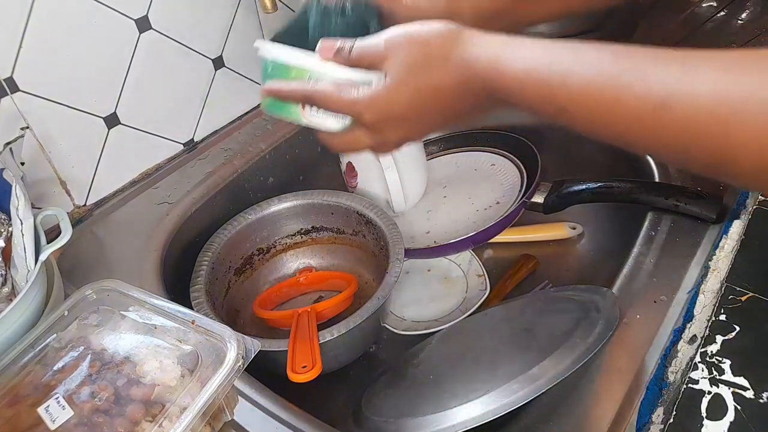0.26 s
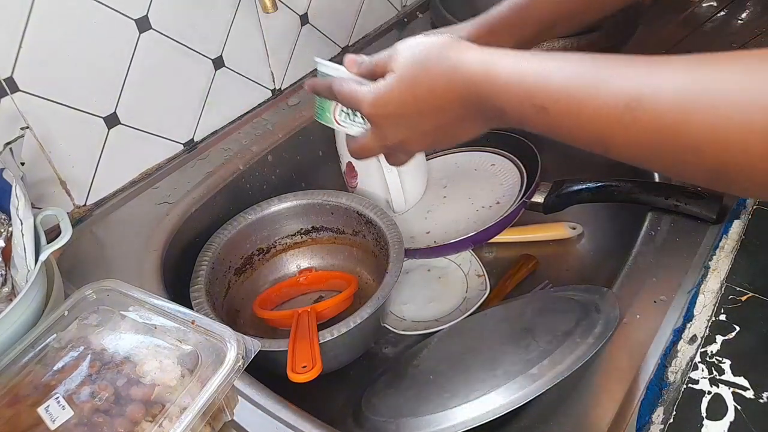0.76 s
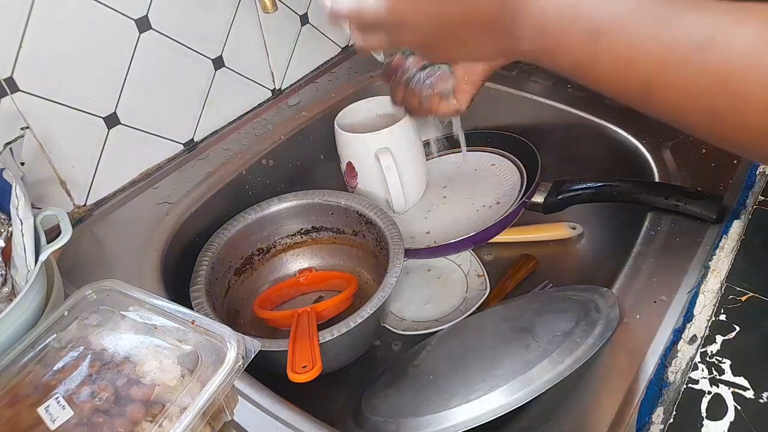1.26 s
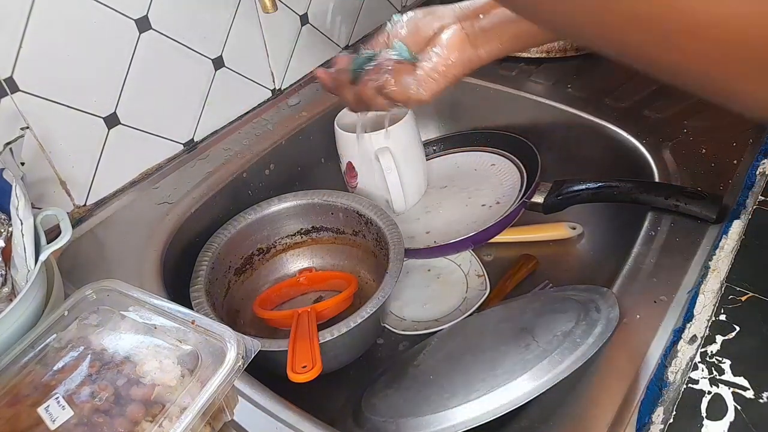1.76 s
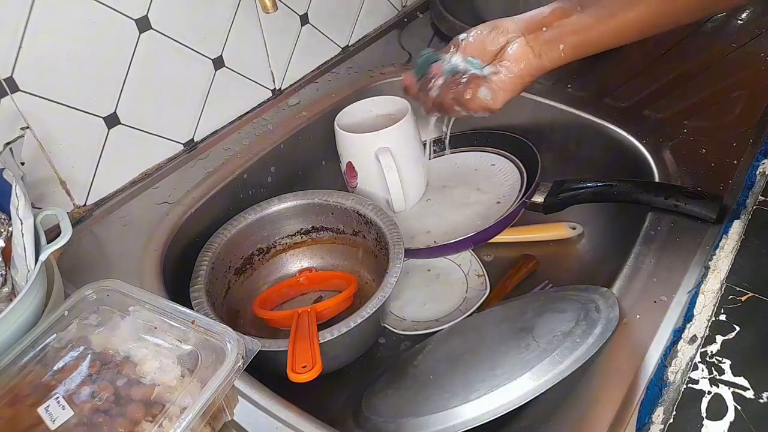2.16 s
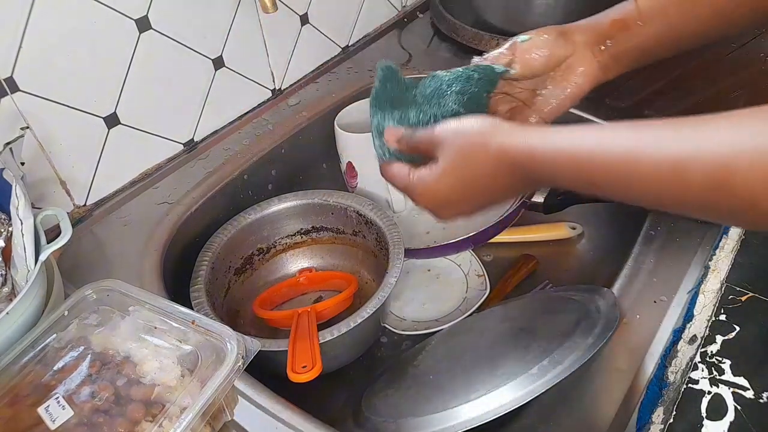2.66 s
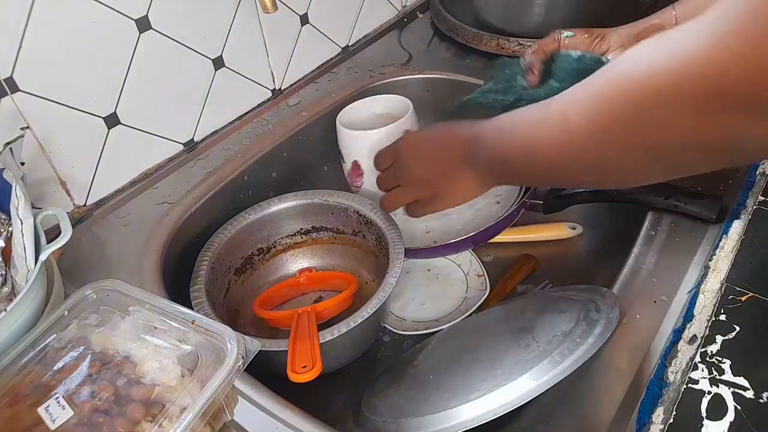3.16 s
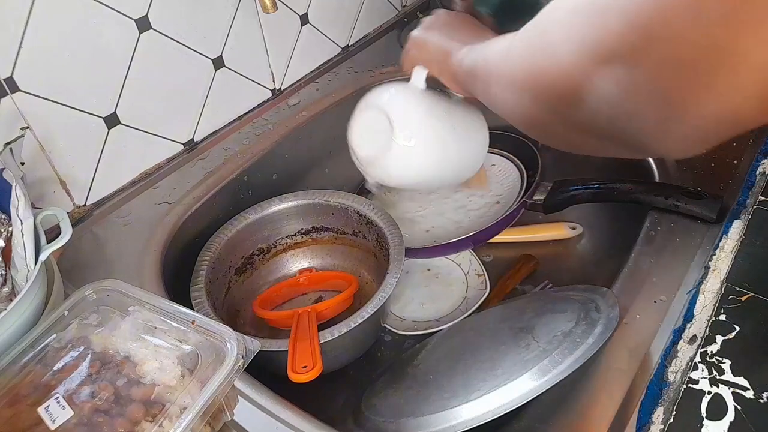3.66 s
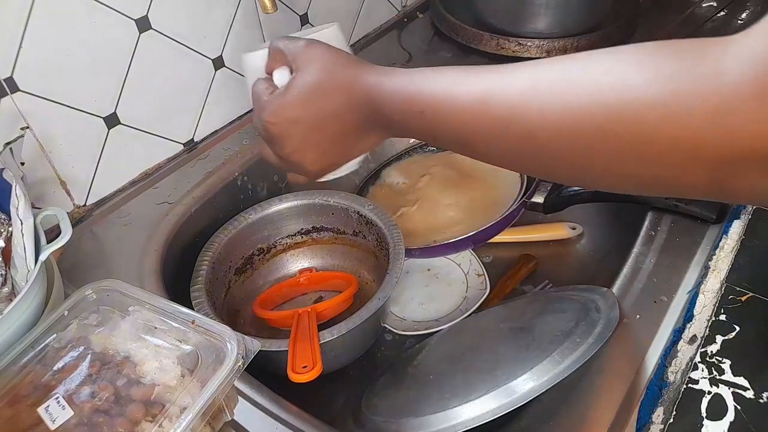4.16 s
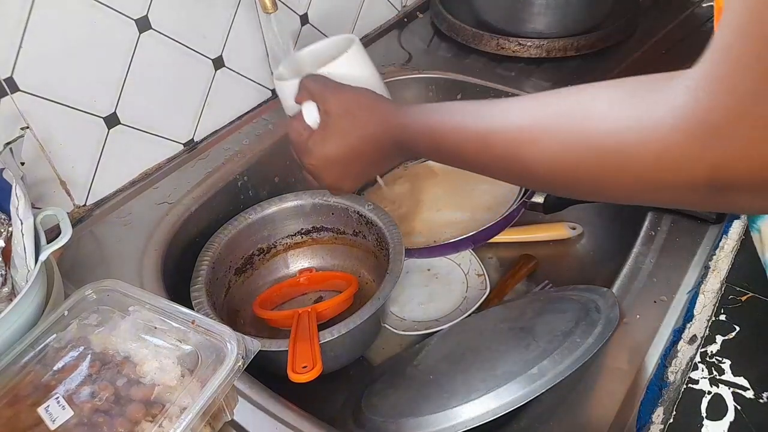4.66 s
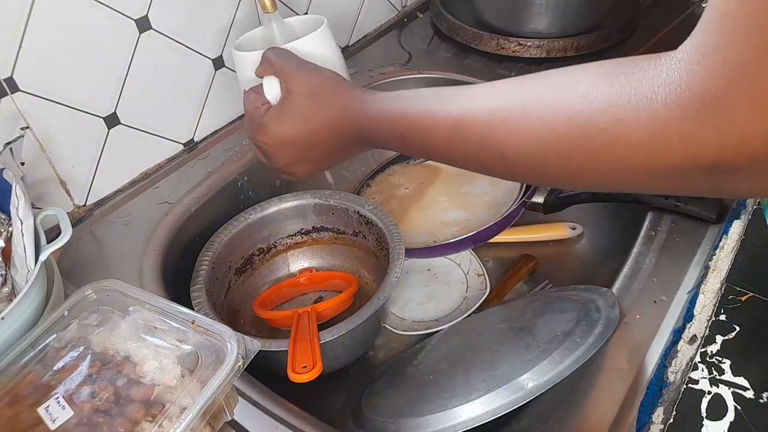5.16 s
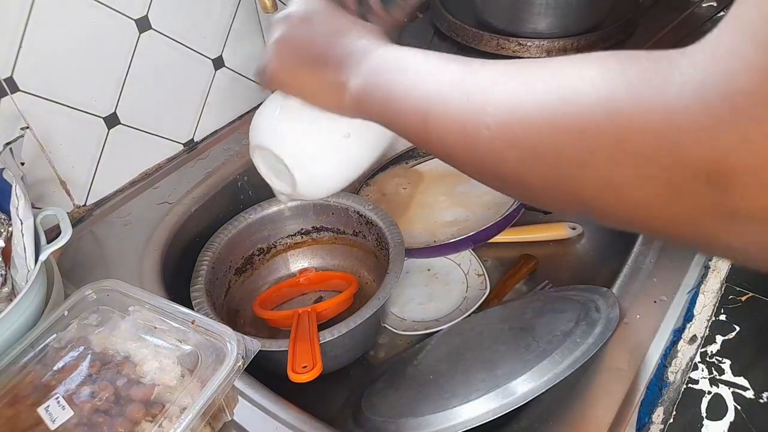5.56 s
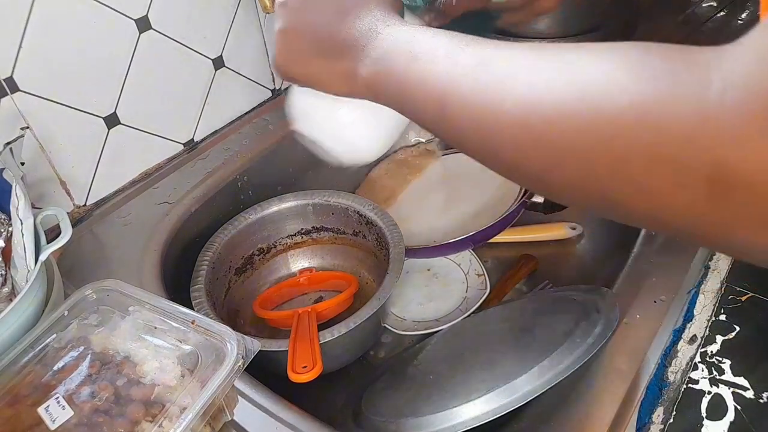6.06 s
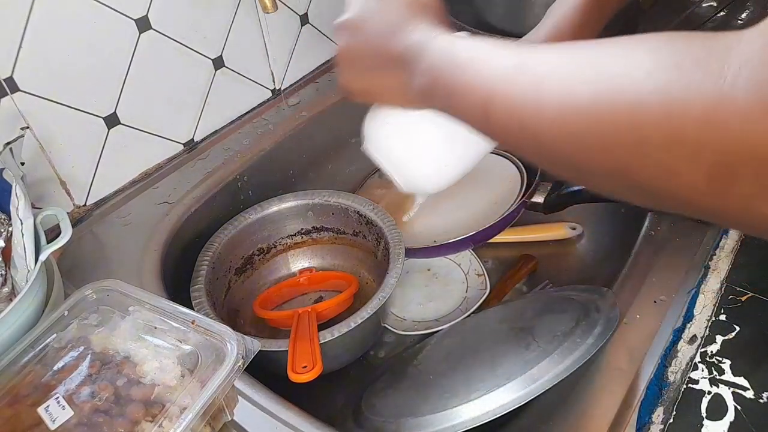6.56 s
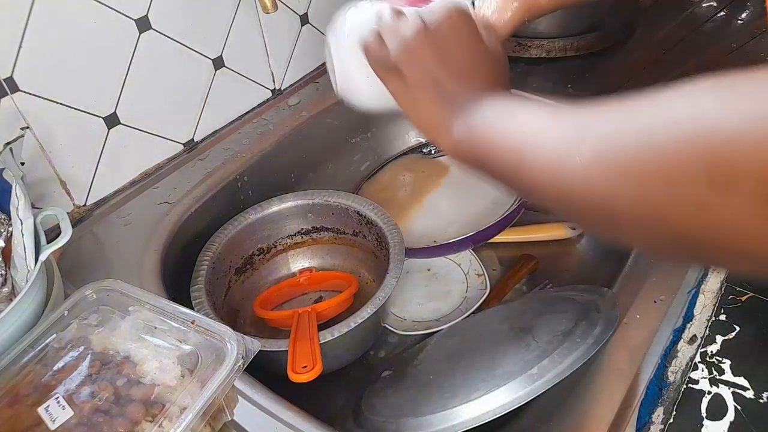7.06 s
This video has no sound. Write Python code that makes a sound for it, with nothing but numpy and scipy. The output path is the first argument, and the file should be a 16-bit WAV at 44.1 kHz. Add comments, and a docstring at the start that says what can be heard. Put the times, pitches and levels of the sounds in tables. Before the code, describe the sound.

Close in a tiled kitchen, a wet sponge fizzes and squelches, a plastic tub cracks down, a mug bumps dishes, then water is poured out.

```python
"""A wet sponge fizzes and squelches close by, amid slaps of water, dull thumps and single drops.
A plastic tub cracks down on the counter, a mug bumps stacked dishes and is emptied in gushes and gulps.
Water is shaped noise with swarms of resonating bubbles; solid bodies are sums of decaying modes.
The tiled kitchen answers with diffuse reverberation, and with standing waves after the tub and hollow notes."""
import sys
import numpy as np
from scipy import signal
from scipy.fft import rfft, irfft
from scipy.io import wavfile

SR = 44100
rng = np.random.default_rng(int(sys.argv[2]) if len(sys.argv) > 2 else 0)


def store_pcm(level_fs):
    """Save levels as 16-bit WAV."""
    pcm = np.round(np.clip(level_fs, -1, 1) * 32767).astype(np.int16)
    wavfile.write(sys.argv[1], SR, np.atleast_2d(pcm).T)


N = 321930
AGE = np.arange(SR // 2) / SR  # time since an event [s]

# Levels are relative: each source adds its own mixing gains.
# Background quiet of the kitchen: (frequency [Hz], relative density [dB])
FLOOR_SPECTRUM = [(20, -23.5), (40, -9), (56, 10), (85, -12.5), (140, -2.5), (220, -17.5), (390, -10),
                  (600, -20.5), (1100, -23.5), (2000, -17.5), (5000, -22), (8000, -26.5), (15500, -23)]
FLOOR_DB = -62
# Reverberation time of the room: (frequency [Hz], t60 [s])
ROOM_T60 = [(60, 0.13), (150, 0.92), (350, 0.42), (700, 0.5), (2000, 0.57), (5000, 0.63), (12000, 0.54)]
# Left-right correlation of diffuse sound: (frequency [Hz], correlation [-1 to 1])
CORRELATION = [(60, 0.99), (150, 0.55), (300, 0.61), (550, 0.57), (900, -0.21), (1400, -0.09),
               (2500, -0.045), (16000, 0.17)]
# Standing waves between the tiled walls: (frequency [Hz], gain [dB])
STANDING_MODES = [(325, 14), (377, 2.5), (402, 10.5), (610, 13.5), (703, 7), (748, 7.5), (1214, 2.5),
                  (1337, 8), (1475, 3), (1603, 8), (1766, 5), (2245, 12)]
# Limits of the microphones and their input
BAND_EDGE_HZ, OVERLOAD = 16000, 0.9

# Spectra of the water sounds: (frequency [Hz], relative density [dB])
FIZZ_SPECTRUM = [(1500, -6.5), (2800, -4.5), (4200, 1), (6000, -7), (8200, -13), (11000, -6), (15500, -8)]
SPRAY_SPECTRUM = [(1500, -16), (2800, -3), (5000, -2), (6500, -3), (8200, -9), (10500, -4), (15500, -9)]
SQUELCH_SPECTRUM = [(450, -26.5), (850, -2.5), (1100, -10), (1500, -6), (2100, -1), (2700, -7),
                    (4000, -23.5)]
SLOSH_SPECTRUM = [(35, -33), (60, -5), (140, -2), (230, -7), (400, 1), (600, -2.5), (850, -7), (1400, -30)]

# Presses and wipes of the sponge:
# (start [s], length [s], fizz level [dB], squelch level [dB], slosh level [dB])
SQUEEZES = [(-.03, 0.21, -53.5, -58.5, -54.5), (.09, .03, -45.5, -48, -44), (.123, 0.1, -38.5, -42, -39),
            (.24, 0.12, -62, -54, -44.5), (.343, 0.058, -49, -42, -41.5), (.46, 0.12, -59, -51.5, -58),
            (.69, 0.13, -62, -55, -61.5), (1.07, 0.085, -63, -62, -61), (1.3, .12, -54.5, -55, -49),
            (1.47, 0.017, -51, -50.5, -48.5), (1.62, 0.18, -58.5, -55.5, -58.5),
            (1.78, 0.021, -45, -47.5, -49.5), (2.16, 0.017, -50.5, -43, -43.5),
            (2.34, 0.02, -52.5, -49.5, -53), (2.48, 0.12, -58.5, -55.5, -60.5),
            (2.72, 0.081, -72, -71, -80), (2.92, 0.062, -64.5, -65, -71), (6.42, 0.081, -63, -52.5, -57),
            (6.68, 0.18, -64, -60.5, -49.5), (6.97, 0.041, -57.5, -58, -68), (7.08, 0.14, -96, -73, -58)]
SQUEEZE_RISE_S, SQUEEZE_SAG_DB_PER_S, SQUEEZE_RELEASE_DB_PER_S = 0.017, 14, 203.5
# Suds seething on between the early squeezes: (fizz level [dB], squelch level [dB], slosh level [dB])
SUDS_LEVELS = (-71.5, -66, -65)
SUDS_S = 2.555

# Slaps of water and wet sponge: (time [s], level [dB], body relative to level [dB], length [s])
SPLATS = [(0.134, -16, -3, 0.018), (.184, -14.5, 0.5, .015), (0.351, -32, 7.5, 0.049),
          (0.482, -28.5, -10, .009), (0.537, -34, 4, .006), (0.79, -44, 18, 0.063),
          (1.081, -36.5, 4.5, .012), (1.497, -35, 12.5, 0.015), (1.783, -33, 2.5, 0.069),
          (2.344, -34.5, 3.5, 0.02), (2.527, -39, 6, 0.031), (3.742, -26.5, -19, 0.0077),
          (3.796, -24.5, -28, .016), (4.036, -39, 13, 0.015), (4.67, -32.5, 8.5, 0.0057),
          (4.768, -25, -20, 0.022), (4.865, -16.5, -19, 0.013), (5.023, -27, -16, .008),
          (5.1, -32, -18, .008), (5.212, -26, -14, 0.024), (5.922, -19, -11, .02),
          (6.058, -25.5, -17, 0.032)]

# Mug bumping the dishes:
# (time [s], dishes level [dB], sink level [dB], china level [dB], scrape level [dB])
BUMPS = [(3.169, -37, -41, -38, -43), (3.186, -28, -38, -27.5, -42), (3.22, -32, -29, -39, -40.5),
         (3.2538, -15, -19, -28, -40), (3.2812, -16.5, -30, -30.5, -32.5), (3.303, -23, -23, -24, -28)]
# Dull thumps of hand and water: (time [s], hollow level [dB], sink level [dB])
THUMPS = [(0.138, -33.5, -69), (0.191, -56, -35.5), (0.273, -48, -52), (0.354, -36.5, -66),
          (2.063, -27.5, -42), (2.123, -35, -42), (2.579, -73.5, -52.5), (4.305, -59, -44.5),
          (5.758, -48, -55), (6.249, -26, -47), (6.284, -32, -59), (6.317, -36.5, -66), (6.723, -58, -52.5),
          (6.768, -46.5, -57)]
# Modes of the bodies struck: (frequency [Hz], relative level [dB], t60 [s])
DISH_MODES = [(246, -11, 0.041), (335, -4.5, 0.08), (453, 1, 0.0081), (531, -5, 0.069), (756, -8.5, 0.036),
              (855, -2.5, 0.02), (1045, -21, 0.013)]
SINK_MODES = [(67, -4.5, 0.38), (86.1, -12.5, 0.74), (109, -0.5, 0.15), (135.7, -3.5, 0.2)]
CHINA_MODES = [(1680, -2, 0.012), (2170, 6.5, 0.016), (3504, -1, 0.026), (5200, 1, 0.005)]
HOLLOW_MODES = [(146, -19, 0.1), (216, 19, 0.014), (322, 10, 0.076), (435, 3, 0.026), (562, 18, 0.059),
                (717, 3.5, 0.042)]
# Gritty scrape: (frequency [Hz], relative density [dB])
GRIT_SPECTRUM = [(500, -10.5), (1000, -14), (1400, 5), (4000, 5.5), (5500, 3.5), (8000, -5), (10000, -4.5),
                 (13500, -2), (16000, -18)]
# Thud of the whole stack shifting: (frequency [Hz], relative density [dB])
THUD_SPECTRUM = [(50, -16), (110, 1), (190, -6), (340, 1), (560, -1.5), (660, -8), (880, 3), (1100, -16.5),
                 (1400, -25), (3000, -41)]
THUD_RE_DISHES_DB, THUD_DECAY_S = -5.5, 0.012

# Single drops and the bubbles they trap: (time [s], level [dB], pitch [Hz])
DROPS = [(0.3529, -35, 1720), (.5412, -41, 864), (3.9086, -33.5, 5600), (4.0385, -27, 2840),
         (4.045, -28.5, 3300), (4.135, -38.5, 1080), (4.596, -31.5, 5540), (4.631, -34, 5100),
         (4.647, -30, 3680), (4.6717, -34, 3400), (4.7985, -27, 5400), (4.871, -26, 7500),
         (4.921, -25, 2340), (5.032, -30.5, 5860), (5.1014, -38, 6330), (5.1603, -28, 4700),
         (5.8238, -38.5, 1480), (5.837, -30.5, 6580), (5.927, -26, 2400), (5.944, -26.5, 3450),
         (6.008, -38, 820), (6.865, -41.5, 820), (7.009, -34, 1980)]
DROP_CYCLES, DROP_RISE = 5.3, 0.087  # ring time [cycles], fractional pitch rise per ring time
DROP_TICK_DB, DROP_TICK_S = -13, 0.0013  # tick relative to its bubble, tick decay
# A drop on the rim of a pan: (time [s], level [dB])
PAN_PING = (4.143, -50)
# Mode of the pan: (frequency [Hz], relative level [dB], t60 [s])
PAN_MODES = [(5060, 0, .09)]

# Short low hollow notes: gulps, their fluttering echoes, and knocks of the sponge in the mug:
# (time [s], level [dB], pitch [Hz], swell [s])
HOLLOW_NOTES = [(1.366, -46.5, 492, 0.0032), (5.2215, -17, 668, 0.002), (5.248, -32, 608.4, 0.008),
                (5.283, -35, 706, 0.002), (5.3415, -13.5, 680, 0.0016), (5.37, -32, 680, 0.0016),
                (6.25, -33.5, 531, 0.0054), (7.006, -38.5, 477, 0.0013), (7.079, -39, 457, 0.0013),
                (7.153, -36, 456, 0.0023)]

# The tub striking the counter: (time [s], level [dB])
TUB_HIT = (1.9803, 0.39)
# Crack of the tub: (frequency [Hz], relative density [dB])
TUB_SPECTRUM = [(50, -44), (180, -21.5), (260, -16), (380, 0), (540, -14), (720, -4), (950, -9), (1300, 0),
                (2350, -3.5), (3150, -21.5), (4200, -16), (8000, -29.5), (12000, -30.5), (16000, -38)]

# Gushes from the tipped mug:
# (start [s], length [s], spray level [dB], bubbles level [dB], slosh level [dB])
GUSHES = [(3.78, 0.06, -40.5, -47.5, -49), (3.895, 0.1, -47, -50, -53), (4.03, 0.074, -53, -47.5, -51.5),
          (4.49, .07, -53.5, -75, -62), (4.565, 0.066, -44, -78, -66.5), (4.765, .09, -39, -73, -59.5),
          (4.86, 0.076, -33.5, -41.5, -60), (5.04, 0.22, -47, -57, -66), (5.2, 0.14, -35, -40, -57.5),
          (5.75, 0.056, -58.5, -78, -55), (5.815, 0.086, -43.5, -54.5, -60),
          (5.915, 0.16, -39.5, -45.5, -49.5), (6.1, 0.04, -58, -48, -51), (6.235, 0.066, -58, -57, -41.5)]
# Steady faint trickle under the later gushes and after them: same columns
TRICKLE = (4.5, 6, -64.5, -63.5, -59)
GUSH_RISE_S, GUSH_SAG_DB_PER_S, GUSH_RELEASE_DB_PER_S = 0.02, 7, 190

# Water swirling round the mug:
# (start [s], length [s], level [dB], resonance [Hz], glide [octaves/s])
SWIRLS = [(4.484, 0.047, -51, 1884, 4), (4.63, 0.063, -54.5, 1740, 1), (4.794, 0.039, -50.5, 1642, 6),
          (4.856, .1, -40.5, 2303, 0.4)]
SWIRL_RISE_S, SWIRL_SAG_DB_PER_S, SWIRL_RELEASE_DB_PER_S = 0.02, 2, 400
# Hum of the air in the mug: (start [s], length [s], level [dB])
HUMS = [(4.5, 0.33, -69), (4.86, 0.082, -47), (5.1, 0.092, -52.5)]
# Modes of that air: (frequency [Hz], relative level [dB], t60 [s])
MUG_AIR_MODES = [(635, 0.27, 0.075), (1010, -1.2, 0.02)]


def amp(db):
    """Decibels: twenty make a tenfold amplitude ratio."""
    return 10 ** (np.asarray(db) / 20)


def unit(x):
    """Normalization to unit root-mean-square."""
    return x / np.sqrt(np.mean(x ** 2) + 1e-20)


def peaked(x):
    """Normalization to unit peak."""
    return x / (abs(x).max() + 1e-20)


def read(points, hz):
    """Linear interpolation of a table along a logarithmic frequency axis."""
    f, value = np.transpose(points)
    return np.interp(np.log(hz + 1), np.log(f + 1), value)


def add(mix, start_s, sound):
    """Superposition: a sound is added to the mix at its onset."""
    part = mix[max(round(start_s * SR), 0):][:len(sound)]
    part += sound[:len(part)]


def impulse(spectrum, size=4096):
    """Minimum phase: the log gain's Hilbert transform fixes the most compact causal click."""
    log_gain = np.log(amp(read(spectrum, abs(np.fft.fftfreq(size, 1 / SR)))))
    response = np.exp(np.conj(signal.hilbert(log_gain)))
    return np.fft.ifft(response).real[:size // 2]


def colour(x, spectrum):
    """Linear filtering: each channel is convolved with a minimum-phase impulse response."""
    return signal.oaconvolve(x, impulse(spectrum)[None], axes=1)[:, :x.shape[1]]


def diffuse(pair):
    """Diffuse-field coherence: mixing two independent signals sets their correlation by frequency."""
    a, b = rfft(pair)
    same = np.clip(read(CORRELATION, np.fft.rfftfreq(pair.shape[1], 1 / SR)), -1, 1)
    right = same * a + np.sqrt(1 - same ** 2) * b
    return irfft(np.array([a, right]), pair.shape[1])


def ports(x, lag_ms):
    """Arrival-time difference: a positive lag delays the right microphone."""
    return np.array([x, np.roll(x, round(lag_ms * SR / 1000))])


def kitchen(x, wet_db, early_db):
    """Reverberation: sparse random echoes decay by frequency, reinforced early by basin and wall."""
    taps = rng.standard_normal((2, SR)) * (rng.random((2, SR)) < 0.15)
    hz, t, z = signal.stft(diffuse(taps), SR, nperseg=256)
    decay = amp(-60 * t / read(ROOM_T60, hz)[:, None])
    tail = signal.istft(z * decay, SR, nperseg=256)[1][:, :SR]
    t = np.arange(SR) / SR
    onset = np.clip(t * 1000 - 1, 0, 1)  # silent for 1 ms, full at 2 ms
    tail = unit(tail * onset) / np.sqrt(SR)
    tail = tail * (amp(wet_db) + amp(early_db) * np.exp(-t / 0.0077))
    return signal.fftconvolve(np.atleast_2d(x), tail, axes=1)[:, :N]


def standing(x, t60):
    """Room modes: standing waves build up and decay, with a chance phase at each microphone."""
    decay = np.log(1000) / t60
    waves = 0
    for hz, db in STANDING_MODES:
        phase = rng.random() + 0.42 * rng.random((2, 1))  # turns
        waves = waves + amp(db) * np.sin(2 * np.pi * (hz * AGE + phase))
    swell = (1 - np.exp(-AGE / 0.012)) * np.exp(-decay * AGE)
    return signal.fftconvolve(x[None], waves * swell * 2 * decay / SR, axes=1)[:, :N]


def ring(modes):
    """Modal superposition: one blow excites decaying modes of chance strength and sign."""
    total = 0
    for hz, db, t60 in modes:
        decay = amp(db + rng.normal(0, 1) - 60 * AGE / t60)
        total = total + decay * rng.choice([-1, 1]) * np.sin(2 * np.pi * hz * AGE)
    return peaked(total)


def bubble(hz, ring_s, rise=0.046):
    """Bubble resonance: trapped air rings and rises in pitch as it nears the surface."""
    ring_s = max(ring_s, 0.002)
    age = np.arange(int(ring_s * SR * 2)) / SR / ring_s  # in ring times
    turns = np.cumsum(hz * (1 + rise * age)) / SR
    envelope = (1 - np.exp(-age / 0.45)) * np.exp(-4 * age)
    return peaked(np.sin(2 * np.pi * turns) * envelope)


def pops(per_s, spread_db):
    """Random point process: a positive spread makes a few impulses strong, a negative one faint."""
    happens = rng.random(N) < per_s / SR
    sign = rng.choice([-1, 1], N)
    return happens * sign * amp(spread_db * np.minimum(rng.exponential(1, N), 4))


def crackle(spectrum, per_s, spread_db, hiss):
    """Shot noise: films and droplets burst at four places over a smooth diffuse hiss."""
    bursts = sum(ports(pops(per_s / 4, spread_db), lag) for lag in np.linspace(-0.1, 0.35, 4))
    noise = unit(bursts) + hiss * diffuse(rng.standard_normal((2, N)))
    return unit(colour(noise, spectrum))


def bubbling(low_hz, high_hz, per_s, cycles, spread_db, count=24):
    """Resonator ensemble: each bubble size has a ring time set in cycles, at least 2 ms."""
    total = 0
    for hz in np.geomspace(low_hz, high_hz, count):
        train = pops(per_s / count, spread_db)
        voice = signal.oaconvolve(train, bubble(hz, cycles / hz))[:N]
        total = total + ports(voice, rng.uniform(-0.063, 0.3))
    return unit(total)


def lumps(depth_db, length_s):
    """Amplitude modulation: uneven clumps of water give a quickly wandering gain."""
    knots = np.arange(0, N / SR + 1, length_s)
    wander = np.interp(np.arange(N) / SR, knots, rng.standard_normal(N)[:len(knots)])
    return unit(amp(depth_db * wander))


def stroke(start, length, rise_s, sag_db_per_s, release_db_per_s):
    """Envelope of one push: linear rise, then exponential sag and faster release."""
    age = np.maximum(np.arange(N) / SR - start, 0)
    sag_db = sag_db_per_s * np.minimum(age, length)
    release_db = release_db_per_s * np.maximum(age - length, 0)
    return np.minimum(age / rise_s, 1) * amp(-sag_db - release_db)


def strokes(rows, *shape):
    """Superposed envelopes of one shape: one gain for each level column."""
    return sum(amp(levels_db)[:, None] * stroke(start, length, *shape)
               for start, length, *levels_db in rows)


def quiet():
    """Stationary noise: a shaped diffuse field fills the background."""
    return amp(FLOOR_DB) * unit(colour(diffuse(rng.standard_normal((2, N))), FLOOR_SPECTRUM))


def sponge():
    """Two-phase flow: foam fizzes, air squelches through wet pores, water slops off the hands."""
    squeezes = strokes(SQUEEZES, SQUEEZE_RISE_S, SQUEEZE_SAG_DB_PER_S, SQUEEZE_RELEASE_DB_PER_S)
    suds = strokes([(0, SUDS_S, *SUDS_LEVELS)], SQUEEZE_RISE_S, 0, SQUEEZE_RELEASE_DB_PER_S)
    fizz, squelch, slosh = squeezes + suds
    films = amp(0.5) * crackle(FIZZ_SPECTRUM, per_s=3000, spread_db=5, hiss=0.71)
    small_bubbles = amp(-5) * bubbling(3000, 12000, per_s=350, cycles=4, spread_db=-3.5)
    x = fizz * (films + small_bubbles)
    pores = amp(-4.5) * crackle(SQUELCH_SPECTRUM, per_s=900, spread_db=-1, hiss=0.76)
    large_bubbles = amp(-11) * bubbling(850, 2800, per_s=100, cycles=4, spread_db=-3)
    x += squelch * (pores + large_bubbles)
    x += slosh * amp(-6) * crackle(SLOSH_SPECTRUM, per_s=570, spread_db=-0.5, hiss=0.32)
    x *= lumps(depth_db=2, length_s=0.008)
    return x + kitchen(x, wet_db=-6, early_db=6.5)


def splats():
    """Liquid impact: a landing lump of water gives a quick burst of droplets over a lower slap."""
    spray, slap = np.zeros((2, N))
    for start, db, body_db, length in SPLATS:
        shape = (1 - np.exp(-AGE / 0.00046)) * np.exp(-2 * AGE / max(length, 0.002))
        noise = rng.standard_normal((2, len(AGE)))
        burst = shape * noise * rng.exponential(1, (2, len(AGE))) ** 0.5
        add(spray, start, amp(db - 5) * peaked(colour(burst[:1], SPRAY_SPECTRUM)[0]))
        add(slap, start, amp(db + body_db - 11.5) * peaked(colour(burst[1:], SQUELCH_SPECTRUM)[0]))
    x = spray + slap
    return ports(x, lag_ms=0.21) + kitchen(x, wet_db=-6, early_db=14)


def knocks():
    """Impact excitation: blows thud, rattle dishes and boom in the basin; the mug's foot scrapes."""
    x, scrape, basin = np.zeros((3, N))
    for start, dishes_db, sink_db, china_db, grit_db in BUMPS:
        noise = rng.standard_normal(len(AGE))
        chatter = noise * rng.exponential(1, len(AGE)) * np.exp(-AGE / 0.013)
        body = amp(dishes_db) * ring(DISH_MODES) + amp(china_db) * ring(CHINA_MODES)
        rattle = peaked(signal.fftconvolve(chatter, body)[:len(AGE)])
        add(x, start, amp(-4.5) * body + amp(dishes_db - 6.5) * rattle)
        thud_noise = rng.standard_normal(len(AGE)) * np.exp(-AGE / THUD_DECAY_S)
        thud = colour(thud_noise[None], THUD_SPECTRUM)[0]
        add(x, start, amp(dishes_db + THUD_RE_DISHES_DB) * peaked(thud))
        add(scrape, start, amp(grit_db) * peaked(chatter))
        add(basin, start, amp(sink_db) * ring(SINK_MODES))
    for start, hollow_db, sink_db in THUMPS:
        add(x, start, amp(hollow_db) * ring(HOLLOW_MODES))
        add(basin, start, amp(sink_db) * ring(SINK_MODES))
    x += colour(scrape[None], GRIT_SPECTRUM)[0]
    # the basin's boom is mostly direct, with a weaker share through the room
    room = kitchen(x + amp(-7.5) * basin, wet_db=-0.5, early_db=9.5)
    return ports(x + basin, lag_ms=0.1) + room


def drops():
    """Bubble entrainment: drops tick straight ahead and trap ringing air; one pings on a pan."""
    x = np.zeros(N)
    for start, db, hz in DROPS:
        add(x, start, amp(db) * bubble(hz, DROP_CYCLES / hz, rise=DROP_RISE))
        tick = rng.standard_normal(len(AGE)) * np.exp(-AGE / DROP_TICK_S)
        add(x, start, amp(db + DROP_TICK_DB) * tick)
    ping_s, ping_db = PAN_PING
    add(x, ping_s, amp(ping_db) * ring(PAN_MODES))
    return x + kitchen(x, wet_db=-1, early_db=1)


def hollow_notes():
    """Tone bursts: each low hollow note swells and dies at one pitch, and the room modes hold it."""
    x = np.zeros(N)
    for start, db, hz, swell in HOLLOW_NOTES:
        age = AGE / swell
        envelope = peaked(age ** 2 * np.exp(-age))
        add(x, start, amp(db) * envelope * np.sin(2 * np.pi * hz * AGE))
    room = kitchen(x, wet_db=-2, early_db=-8)
    return ports(x, lag_ms=0.29) + room + amp(2.5) * standing(x, t60=0.4)


def tub():
    """Impulse response: one very short crack excites the room, which makes nearly all that follows."""
    x, edge = np.zeros((2, N))
    hit_s, hit_db = TUB_HIT
    add(x, hit_s, amp(hit_db) * peaked(impulse(TUB_SPECTRUM)))
    # the bright edge and the ringing plastic rim are heard only directly
    add(edge, hit_s, amp(-9.5) * peaked(impulse(SPRAY_SPECTRUM)))
    add(edge, hit_s, amp(-7.5) * ring([(2455, 0, 0.014)]))
    room = kitchen(x, wet_db=5, early_db=-37.5)
    return ports(x + edge, lag_ms=0.32) + room + amp(6.5) * standing(x, t60=0.44)


def pour():
    """Jet breakup and air entrainment: the stream sprays and beats bubbles into water on the plates."""
    gushes = strokes(GUSHES, GUSH_RISE_S, GUSH_SAG_DB_PER_S, GUSH_RELEASE_DB_PER_S)
    trickle = strokes([TRICKLE], GUSH_RISE_S, 0, GUSH_RELEASE_DB_PER_S)
    spray, bubbles, slosh = gushes + trickle
    droplets = amp(-2) * crackle(SPRAY_SPECTRUM, per_s=1800, spread_db=8.5, hiss=0.84)
    small_bubbles = amp(-13) * bubbling(3290, 9260, per_s=490, cycles=30, spread_db=9.5)
    x = spray * (droplets + small_bubbles)
    churn = amp(-4) * crackle(SQUELCH_SPECTRUM, per_s=670, spread_db=-1, hiss=0.21)
    large_bubbles = amp(-7.5) * bubbling(769.5, 3220, per_s=410, cycles=19, spread_db=4)
    x += bubbles * (churn + large_bubbles)
    x += slosh * amp(-2.5) * crackle(SLOSH_SPECTRUM, per_s=660, spread_db=5, hiss=0.87)
    x *= lumps(depth_db=3, length_s=0.008)
    return x + kitchen(x, wet_db=-6.5, early_db=7)


def swirl():
    """Moving resonance: sloshing water excites a gliding noise band and stirs the air in the mug."""
    x, t = np.zeros(N), np.arange(N) / SR
    shape = SWIRL_RISE_S, SWIRL_SAG_DB_PER_S, SWIRL_RELEASE_DB_PER_S
    lowpass = signal.butter(2, 150, fs=SR)  # half of the 300 Hz bandwidth
    for start, length, db, hz, glide in SWIRLS:
        pitch = hz * 2 ** (glide * np.clip(t - start, 0, length))
        carrier = np.exp(2j * np.pi * np.cumsum(pitch) / SR)
        noise = rng.standard_normal(N) + 1j * rng.standard_normal(N)
        band = unit((carrier * signal.lfilter(*lowpass, noise)).real)
        x += amp(db) * stroke(start, length, *shape) * band
    stirring = pops(per_s=600, spread_db=6.5)
    hum = unit(signal.oaconvolve(stirring, ring(MUG_AIR_MODES))[:N])
    x += strokes(HUMS, *shape)[0] * hum
    return ports(x, lag_ms=0.14) + kitchen(x, wet_db=-2.5, early_db=1)


def scene():
    """Superposition: the sources and the background add linearly."""
    water = sponge() + splats() + drops() + hollow_notes() + pour() + swirl()
    return quiet() + water + knocks() + tub()


def record(dry):
    """Transducer limits: deep bass is shed, peaks are clipped, then the band is limited."""
    x = signal.sosfilt(signal.butter(4, 42, "high", fs=SR, output="sos"), dry)
    clipped = np.clip(x, -OVERLOAD, OVERLOAD)
    lowpass = signal.firwin(511, BAND_EDGE_HZ, window=("kaiser", 9), fs=SR)
    return signal.oaconvolve(clipped, lowpass[None], "same")


dry = scene()
out = record(dry)
store_pcm(out)
```